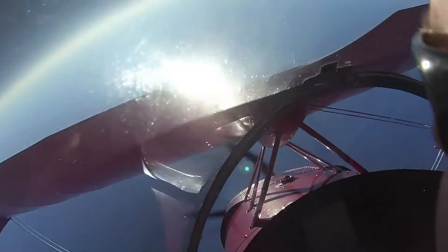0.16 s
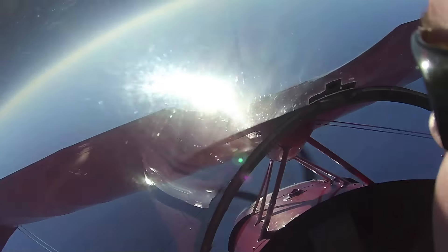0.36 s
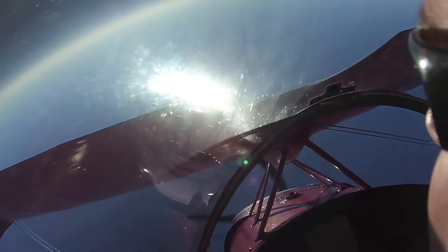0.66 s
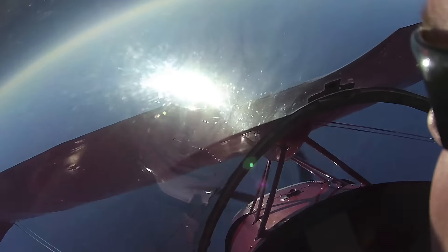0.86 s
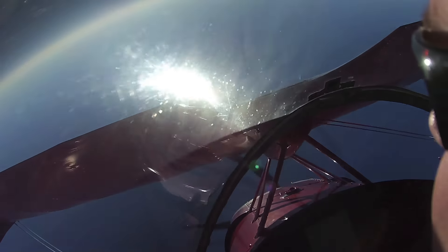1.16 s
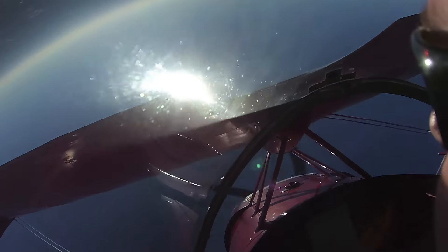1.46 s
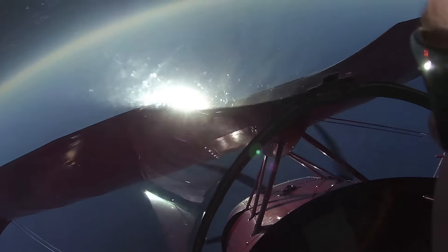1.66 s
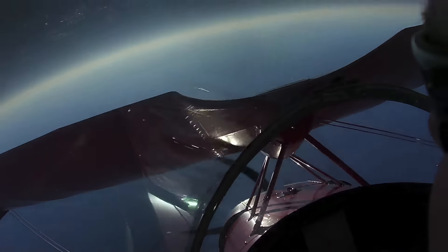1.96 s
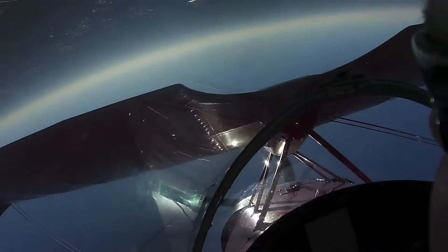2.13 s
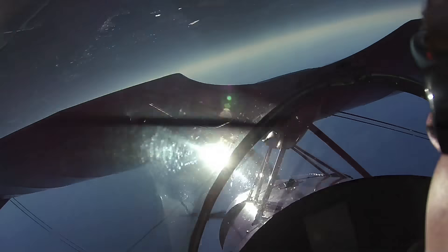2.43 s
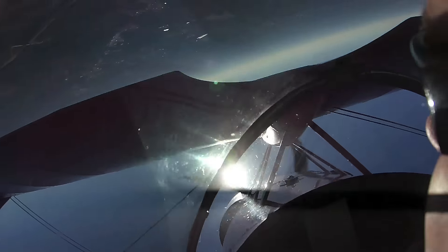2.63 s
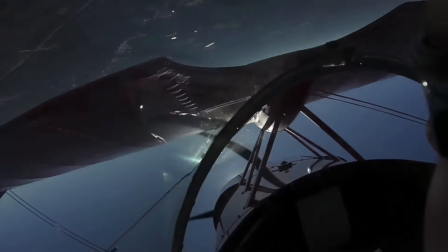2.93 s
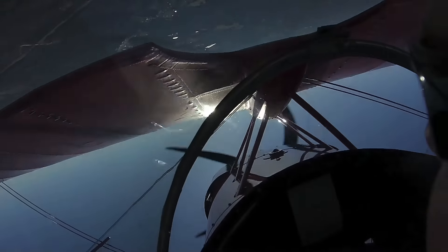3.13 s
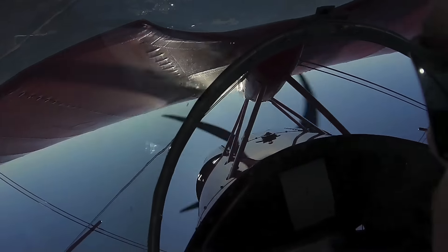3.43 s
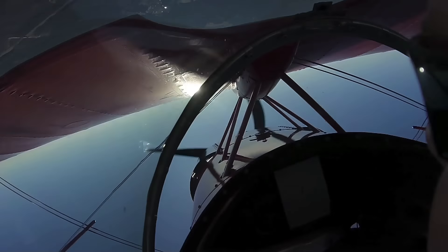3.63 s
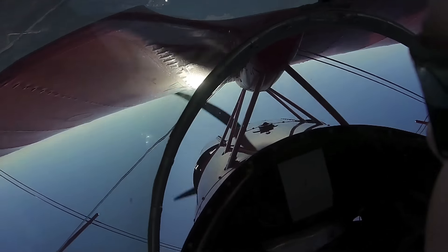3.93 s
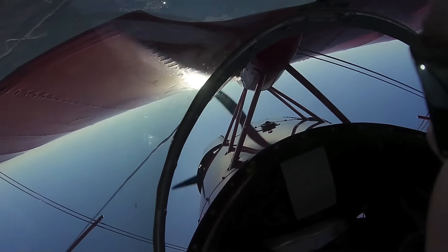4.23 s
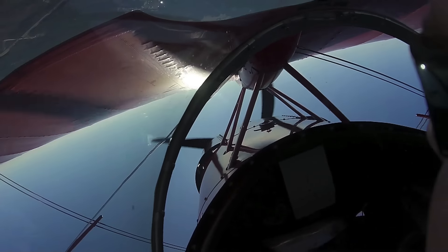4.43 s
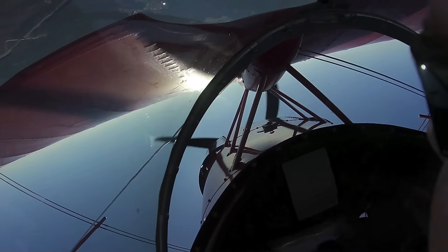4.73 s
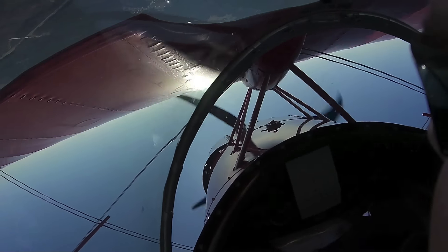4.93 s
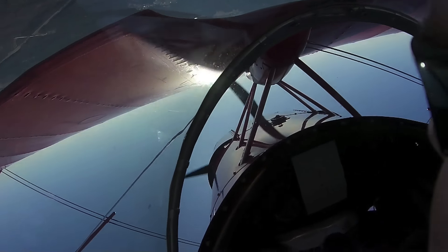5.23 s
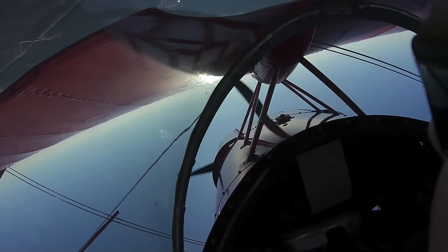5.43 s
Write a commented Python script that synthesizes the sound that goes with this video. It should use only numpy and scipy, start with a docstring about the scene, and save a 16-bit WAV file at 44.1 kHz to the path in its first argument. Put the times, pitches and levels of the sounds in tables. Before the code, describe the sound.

A loud, growling aircraft engine and a bright roar of propeller wind fill a small cockpit, with a faint crackle on the microphone at the peaks. Then the power comes off: the engine and propeller notes sink together and the roar eases. By the end the engine is burbling at idle, while the slipstream keeps rushing and thumping behind the windscreen.

```python
"""A loud, hard drone in roaring air: the cockpit of an aerobatic biplane at full power. Six cylinders
fire down the exhaust and two propeller blades pull at the air, chopping its roar, while eddies thump
behind the windscreen and the loudest peaks overload the microphone. Then the throttle is drawn back:
the notes sink with the shaft, a faint gear whine falls with them, and the engine burbles at idle."""
import sys
import numpy as np
from scipy import signal
from scipy.fft import rfft, irfft, next_fast_len
from scipy.io import wavfile
from scipy.ndimage import map_coordinates

SR = 44100
rng = np.random.default_rng(int(sys.argv[2]) if len(sys.argv) > 2 else 0)


def log_audio(samples):
    """Write samples as a 16-bit WAV file to the path given in sys.argv[1]."""
    # one column per channel
    frames = np.atleast_2d(samples).T
    # limit to full scale, then quantise
    limited = np.clip(frames, -1, 1)
    pcm = np.round(limited * 32767).astype(np.int16)
    wavfile.write(sys.argv[1], SR, pcm)


N = 246078
T = np.arange(N) / SR


def amp(db):
    """Decibels to gain."""
    return 10 ** (np.asarray(db) / 20)


def unit(x):
    """Scale to rms 1."""
    return x / np.sqrt(np.mean(x ** 2) + 1e-20)


def curves(rows):
    """Breakpoints to envelopes, one for each column after the time."""
    times, *columns = np.transpose(rows)
    return [np.interp(T, times, column) for column in columns]


def wobble(rate):
    """A smooth random modulator, rate knots a second."""
    knots = rng.standard_normal(1024)
    coarse_t = T[::64]
    return np.interp(T, coarse_t, map_coordinates(knots, [coarse_t * rate], mode="mirror"))


def fade_db(at_s, half_length_s, depth_db):
    """Attenuation for a brief, bell-shaped dip in level."""
    return depth_db * np.exp(-((T - at_s) / half_length_s) ** 2)


def filtered(x, response):
    """EQ x with a gain given as a function of Hz."""
    size = next_fast_len(N + SR // 2)
    return irfft(rfft(x, size) * response(np.fft.rfftfreq(size, 1 / SR)), size)[:N]


def tone(cycles, db):
    """A cosine of the given rms level."""
    return np.sqrt(2) * amp(db) * np.cos(2 * np.pi * cycles)


def lift_db(resonances, hz):
    """Summed boost and cut of bell-shaped resonances."""
    return sum(db / (1 + (2 * (hz - centre) / width) ** 2) for centre, width, db in resonances)


# the shaft's run-down to idle: t/s, speed/(turns/s)
SHAFT_SPEED = [(0.0, 37.5), (1.69, 37.2), (2.1, 36.6), (2.52, 34.7), (2.95, 32.4), (3.36, 29.6),
               (3.64, 26.1), (3.85, 24.3), (4.02, 21.2), (4.2, 20.1), (4.55, 16.1), (4.69, 16.4),
               (4.94, 17.2), (5.1, 18.4), (5.25, 18.9), (5.58, 19.3)]
# the pilot's throttle move: t/s, opening/(0-1)
THROTTLE = [(0, 0.99), (1.7, 1), (2.3, 0.7), (2.9, 0.39), (3.5, 0.17), (4.3, 0.13), (5.58, 0.12)]


def shaft():
    """The shaft sets the pitch of every note; with little load it runs less evenly."""
    speed, = curves(SHAFT_SPEED)
    throttle, = curves(THROTTLE)
    jitter = (.0009 + .008 * (1 - throttle)) * wobble(12)
    turns = np.cumsum(speed) / SR + jitter
    return turns, speed, throttle


# standing waves at the seat: f/Hz, width/Hz, lift/dB
STANDING_WAVES = [(105.6, 11, 0.5), (126.4, 10.1, -14.5), (137, 14.8, 8), (170.8, 18.4, 7.5),
                  (200, 28, -4.5)]


def note_db(note, order, speed, throttle, idle_speed=19.2, idle_span=1):
    """A note drops with the throttle and again at idle, swelling and dipping through standing waves."""
    full_db, shut_loss_db, idle_loss_db = note
    idling = .5 - .5 * np.tanh((speed - idle_speed) / idle_span)
    source_db = full_db - shut_loss_db * (1 - throttle) - idle_loss_db * idling
    return source_db + lift_db(STANDING_WAVES, order * speed)


# firing note and its octave at source: full-power level/dB, throttle-shut loss/dB, further idle loss/dB
FIRING_NOTES = [(-16.5, 26.5, 8), (-19.5, 11, 14)]


def drone(turns, speed, throttle):
    """Three firings a turn give the main note and its octave, which dips briefly at full power."""
    main_db = note_db(FIRING_NOTES[0], 3, speed, throttle)
    octave_db = note_db(FIRING_NOTES[1], 6, speed, throttle)
    octave_db -= fade_db(at_s=.795, half_length_s=.16, depth_db=28)
    return tone(3 * turns, main_db) + tone(6 * turns, octave_db)


def growl(turns, speed, throttle, base_db=-34, half_order_db=-5, waver_db=4):
    """Under load, unequal cylinders add whole and half orders, loosely bunched into one dip a turn."""
    full_speed, knee_hz, db_per_octave = 37.3, 540, -9  # roll-off, set at full-power turns/s
    crest_hz, spacing_hz, ripple_db = 116, 146.5, 3.5  # comb colour, as through a pipe
    dip_turns, spread_cycles, drift_cycles = .58, .45, .014
    orders = np.setdiff1d(np.arange(2.5, 26.5, .5), (3, 4, 6, 8))  # gaps for drone and propeller
    sound = np.zeros(N)
    for order in orders:
        rolloff_db = db_per_octave * np.log2(max(order * full_speed / knee_hz, 1))
        pipe_db = ripple_db * np.cos(2 * np.pi * (order * speed - crest_hz) / spacing_hz)
        db = base_db + rolloff_db + pipe_db + half_order_db * (order % 1 > 0)
        phase = spread_cycles * (rng.random() - .5) + drift_cycles * wobble(5.2)
        sound += tone(order * (turns - dip_turns) + phase, db + waver_db * wobble(3.07))
    return -throttle ** 1.5 * sound


# the cockpit's boxy resonances: f/Hz, width/Hz, lift/dB
COCKPIT_MODES = [(135, 25, 4), (245, 40, 3), (490, 50, 6), (1790, 170, 3.5)]


def cockpit_gain(spectrum, hz):
    """Gain of a spectrum, read on a log-frequency axis and coloured by the cockpit."""
    points_hz, points_db = np.transpose(spectrum)
    source_db = np.interp(np.log(hz + 1), np.log(points_hz + 1), points_db)
    return amp(source_db + lift_db(COCKPIT_MODES, hz))


def ringing(spectrum, size=4096):
    """A minimum-phase one-shot with this spectrum, ringing in the cockpit."""
    hz = np.fft.rfftfreq(size, 1 / SR)
    cepstrum = irfft(np.log(cockpit_gain(spectrum, hz)))
    cepstrum[1:size // 2] *= 2
    cepstrum[size // 2 + 1:] = 0
    return irfft(np.exp(rfft(cepstrum)))


def rush(spectrum):
    """A noise bed of rms 1, coloured by a spectrum and by the cockpit."""
    return unit(filtered(rng.standard_normal(N), lambda hz: cockpit_gain(spectrum, hz)))


# accent of each cylinder in firing order: relative level/dB
CYLINDER_ACCENTS = [-2, 15, 0, 13, 0, 24]
# tone of one exhaust bang reaching the cockpit: f/Hz, relative level/dB
BANG_SPECTRUM = [(15, -35), (35, -21), (70, -8), (140, 4.5), (240, -12.5), (320, -22.5), (480, -9.5),
                 (650, -13.5), (900, -21), (2000, -30), (5000, -62), (10000, -110)]


def bangs(turns, throttle, full_db=-33, shut_db=-34, stumble=.26, scatter_db=2):
    """Each firing sends a dull, uneven bang down the exhaust; off load they stumble and burble."""
    firings = 3 * turns + stumble * (1 - throttle) * wobble(40)
    onsets = np.flatnonzero(np.diff(np.floor(firings)) > 0)
    accents_db = np.resize(CYLINDER_ACCENTS, len(onsets))
    pulses = np.zeros(N)
    pulses[onsets] = amp(accents_db + scatter_db * rng.standard_normal(len(onsets)))
    exhaust = unit(signal.fftconvolve(pulses, ringing(BANG_SPECTRUM))[:N])
    return exhaust * amp(shut_db + (full_db - shut_db) * throttle)


# envelope of the blade-passing note: t/s, level/dB
BLADE_LEVEL = [(0, -27.5), (1.5, -24.5), (2.15, -17.5), (3, -20.5), (3.75, -30), (4.15, -45), (5.58, -41)]
# two octaves above it, at source: full-power level/dB, throttle-shut loss/dB, further idle loss/dB
BLADE_OCTAVES = [(-25, 1.5, 2), (-32, 3.5, 1.5)]


def propeller(turns, speed, throttle, lag_turns=.09, waver_db=.5):
    """Two blades pass each turn, each a pull of suction: a low note with two wavering octaves."""
    blade_turns = turns - lag_turns
    blade_db, = curves(BLADE_LEVEL)
    dip_db = fade_db(at_s=4.45, half_length_s=.14, depth_db=7.8)  # near the shaft's lowest sag
    suction = tone(2 * blade_turns, blade_db)
    for order, note in zip((4, 8), BLADE_OCTAVES):
        octave_db = note_db(note, order, speed, throttle) - dip_db + waver_db * wobble(9)
        suction += tone(order * blade_turns, octave_db)
    return -suction


# fader ride shared by both air layers: t/s, level/dB
ROAR_LEVEL = [(0, -17), (.7, -14.5), (1.7, -15.5), (2.83, -20), (4.01, -28), (4.72, -30.5), (5.58, -27.5)]
# bright propeller wash at full power: f/Hz, relative level/dB
WASH_SPECTRUM = [(200, -3.5), (330, -3), (450, -6), (620, -4.5), (880, 2), (1300, -1.5), (1950, -2.5),
                 (2700, -10.5), (4000, -18), (5200, -31), (6900, -45), (8300, -42), (10500, -43),
                 (15000, -64)]
# darker slipstream at idle: f/Hz, relative level/dB
SLIPSTREAM_SPECTRUM = [(200, 0.5), (330, 1.5), (450, 4), (620, 2), (880, 1.5), (1300, -0.5), (1800, 1),
                       (2600, -10), (3900, -20.5), (5000, -34), (7100, -47.5), (8300, -41), (10500, -42.5),
                       (15000, -82)]


def air(turns, throttle, wash_trim_db=-.5, slip_trim_db=1, flutter_db=.5):
    """The wash pulses with the engine's beat; as power falls it crossfades into plain slipstream."""
    chop_depths = {1: .027, 2: .14, 3: .096}  # by beats a turn: shaft, blades, firings
    chop = sum(depth * np.cos(2 * np.pi * order * turns) for order, depth in chop_depths.items())
    wash = amp(wash_trim_db) * rush(WASH_SPECTRUM) * (1 - chop)
    slipstream = amp(slip_trim_db) * rush(SLIPSTREAM_SPECTRUM)
    roar = np.sqrt(throttle) * wash + np.sqrt(1 - throttle) * slipstream
    roar_db, = curves(ROAR_LEVEL)
    return amp(roar_db + flutter_db * wobble(20)) * roar


# envelope of the buffeting: t/s, level/dB
BUFFET_LEVEL = [(0, -29), (1.5, -24), (2.3, -27), (4.1, -27.5), (4.4, -34), (4.7, -31), (5.58, -28.5)]
# its low rumble: f/Hz, relative level/dB
BUFFET_SPECTRUM = [(12, -53), (28, -19.5), (62, 0), (130, -0.5), (190, 0.5), (250, -3.5), (320, -18.5),
                   (500, -51), (2500, -120)]


def buffeting(lump_db=2):
    """Eddies behind the windscreen thump in the cockpit."""
    level_db, = curves(BUFFET_LEVEL)
    return amp(level_db + lump_db * wobble(14)) * rush(BUFFET_SPECTRUM)


def spits(x, overload=.5, trough_hz=1000, impulse_db=-22, scatter_db=4, dull_hz=4500):
    """Every deep trough of suction makes the microphone spit a tiny, dulled click."""
    lows = filtered(x, lambda hz: 1 / (1 + (hz / trough_hz) ** 4))
    troughs, _ = signal.find_peaks(-lows, height=overload)
    clicks = np.zeros(N)
    clicks[troughs] = -amp(impulse_db + scatter_db * rng.standard_normal(N)[troughs])
    return filtered(clicks, lambda hz: 1 / (1 + 1j * hz / dull_hz))


def gear_whine(turns, throttle, order=224, shut_db=-69):
    """Off load, a fast gear sings a faint, airy note: a narrow noise band that tracks the shaft."""
    return (1 - throttle) * tone(order * turns, shut_db) * wobble(300)


def scene():
    """One shaft drives exhaust, gear and propeller, mixed in mono with the roar and rumble of the air."""
    turns, speed, throttle = shaft()
    engine = drone(turns, speed, throttle) + growl(turns, speed, throttle)
    engine += bangs(turns, throttle) + gear_whine(turns, throttle)
    return (engine + propeller(turns, speed, throttle) + air(turns, throttle) + buffeting())[None]


def record(dry):
    """The microphone flattens peaks, suction first, with a faint crackle, then sheds sub-bass and top."""
    suction_limit, pressure_limit = -.7, .8
    low_cut_hz, high_cut_hz = 30, 15500
    overloaded = np.clip(dry[0], suction_limit, pressure_limit) + spits(dry[0])
    low_cut = signal.butter(2, low_cut_hz, "highpass", fs=SR, output="sos")
    return filtered(signal.sosfilt(low_cut, overloaded), lambda hz: hz < high_cut_hz)[None]


dry = scene()
out = record(dry)
log_audio(out)
```